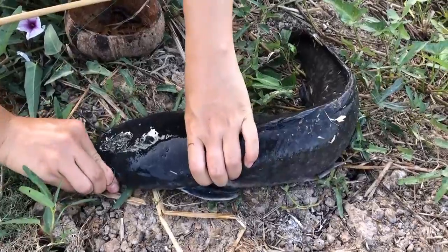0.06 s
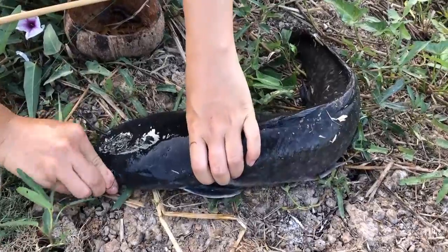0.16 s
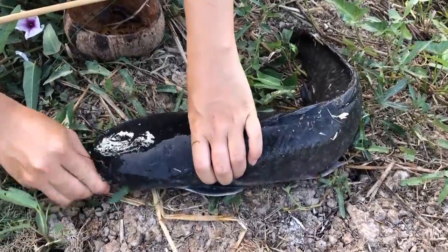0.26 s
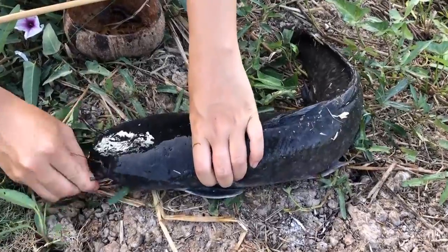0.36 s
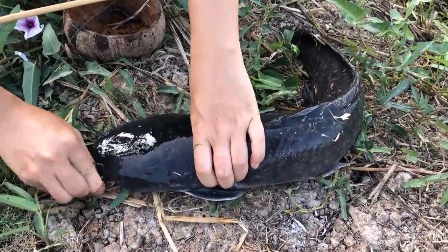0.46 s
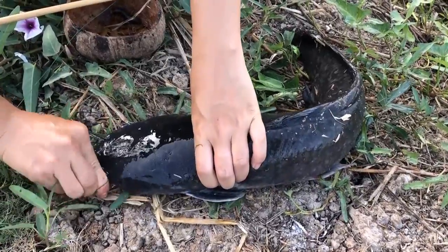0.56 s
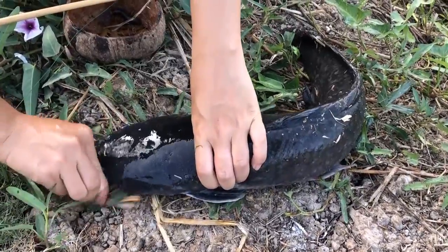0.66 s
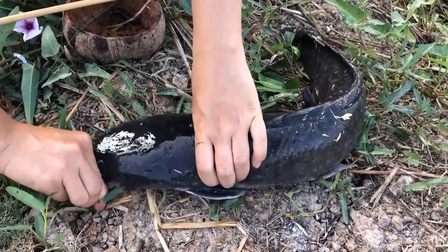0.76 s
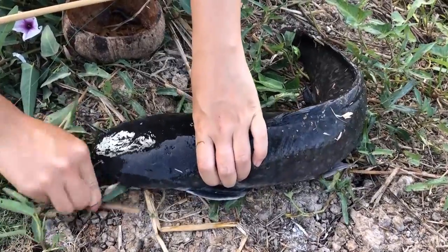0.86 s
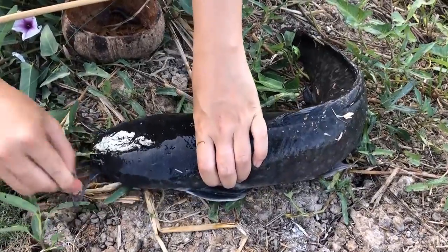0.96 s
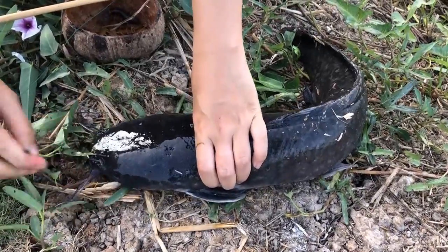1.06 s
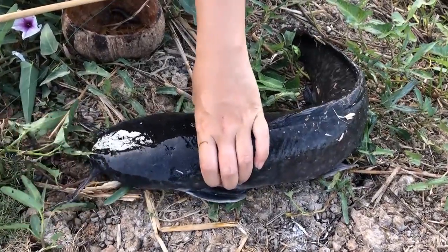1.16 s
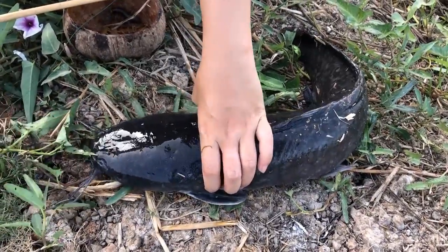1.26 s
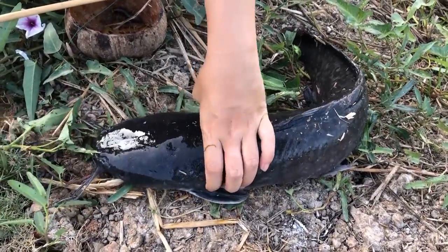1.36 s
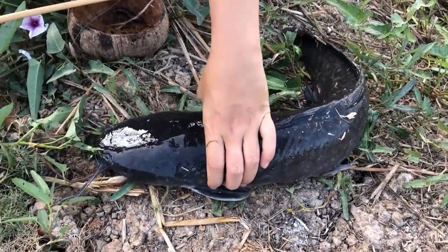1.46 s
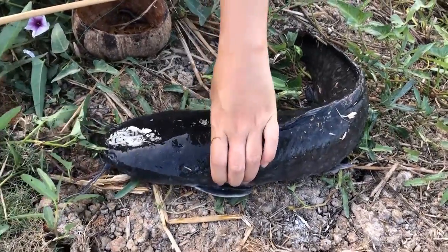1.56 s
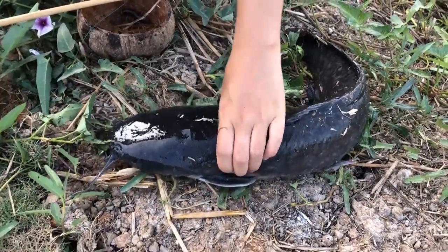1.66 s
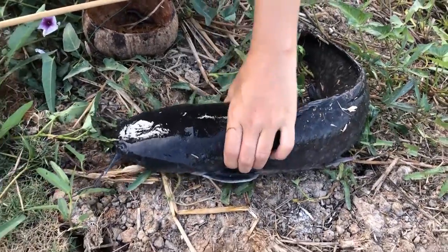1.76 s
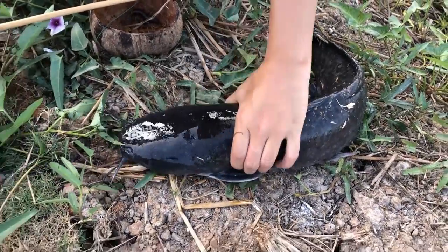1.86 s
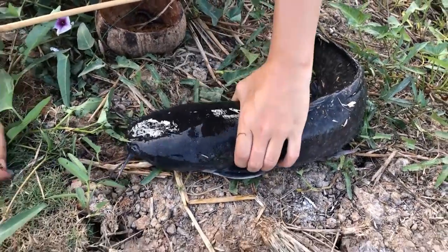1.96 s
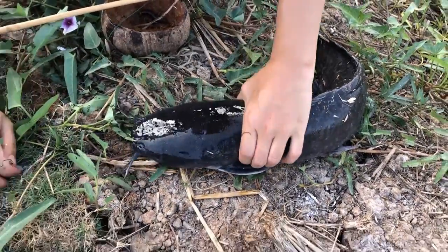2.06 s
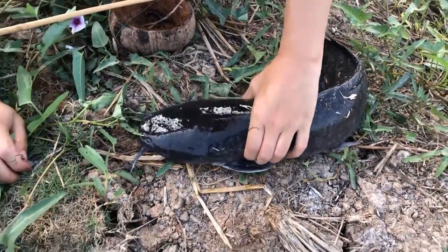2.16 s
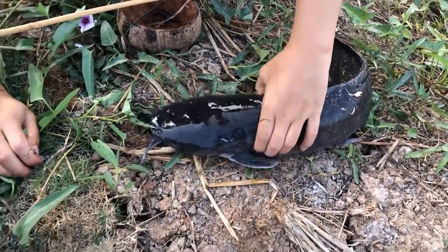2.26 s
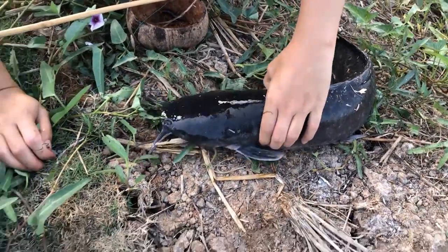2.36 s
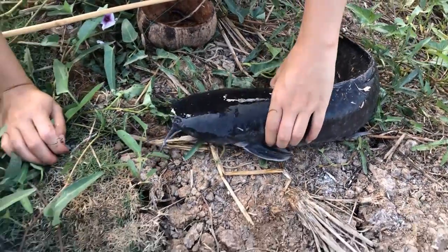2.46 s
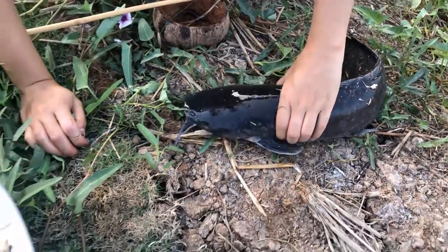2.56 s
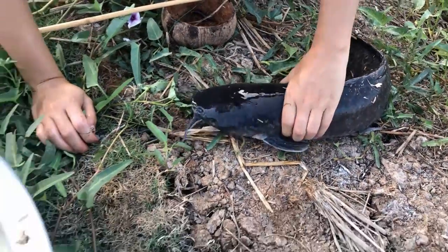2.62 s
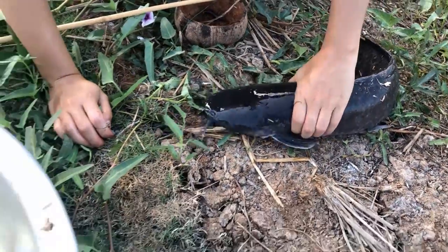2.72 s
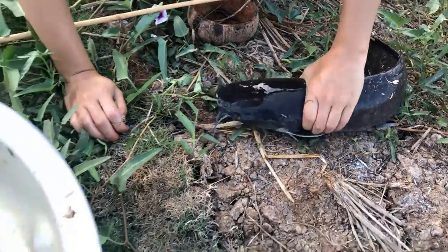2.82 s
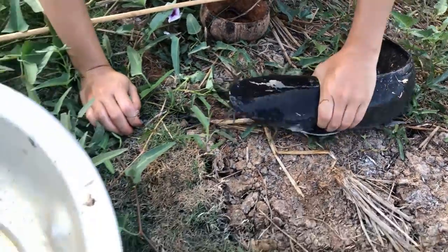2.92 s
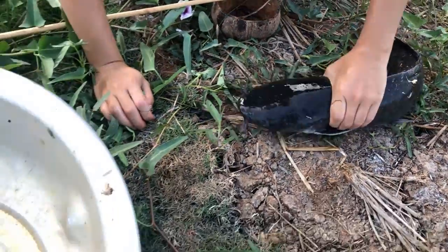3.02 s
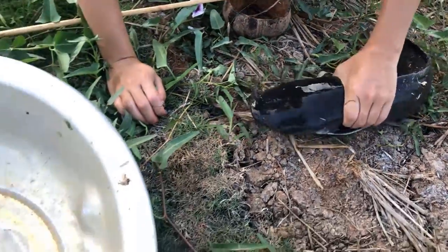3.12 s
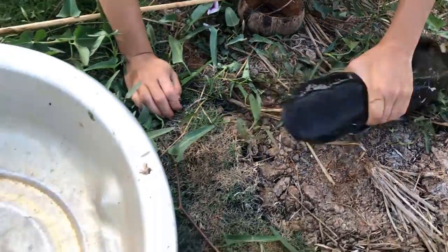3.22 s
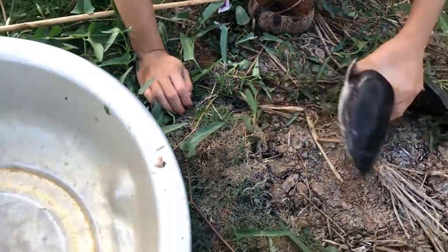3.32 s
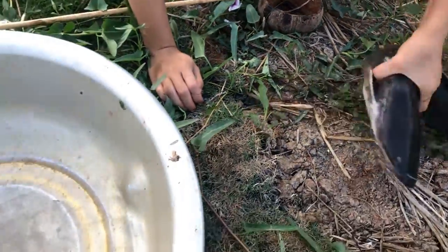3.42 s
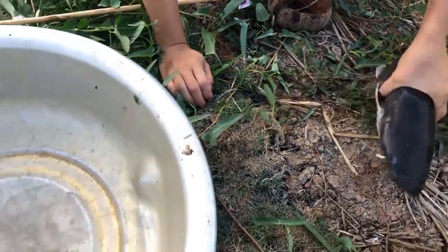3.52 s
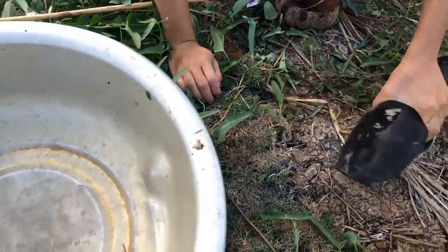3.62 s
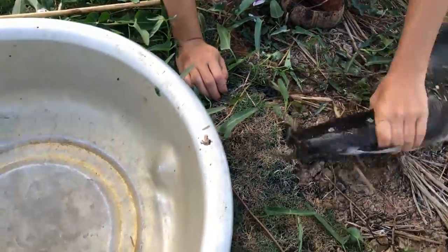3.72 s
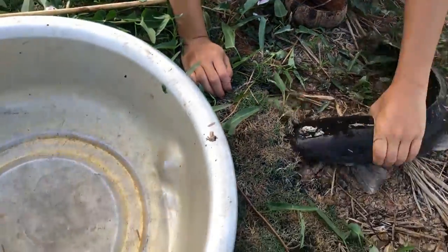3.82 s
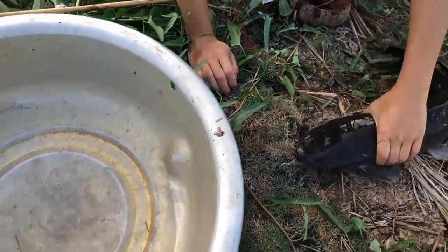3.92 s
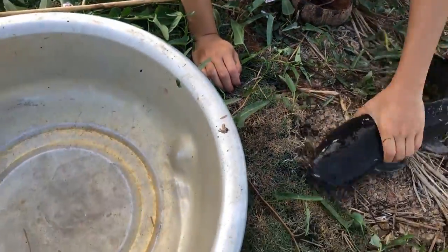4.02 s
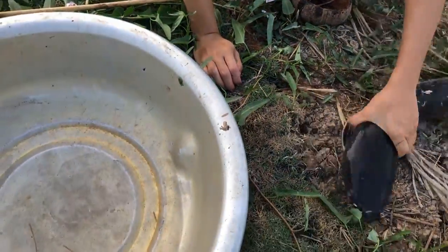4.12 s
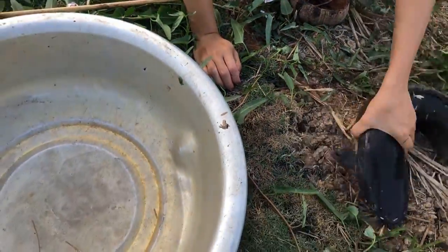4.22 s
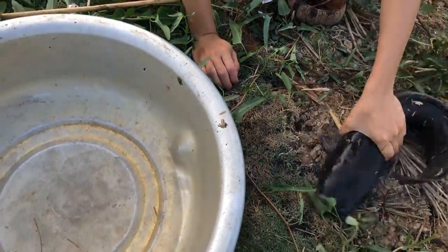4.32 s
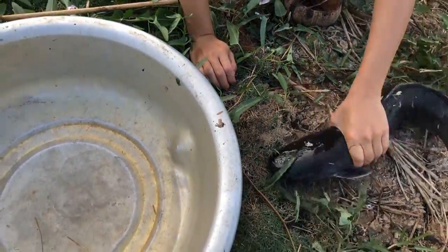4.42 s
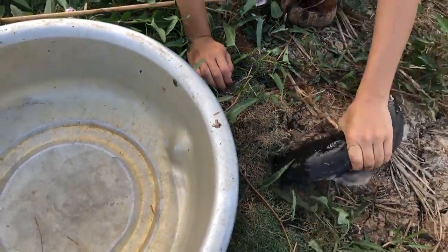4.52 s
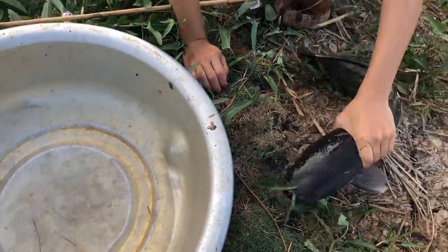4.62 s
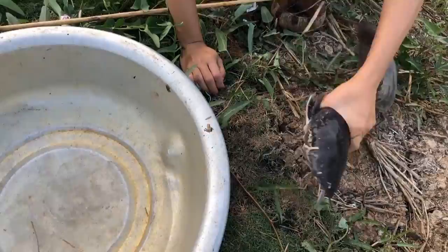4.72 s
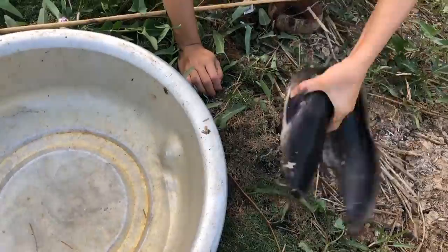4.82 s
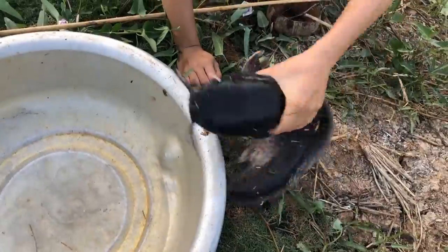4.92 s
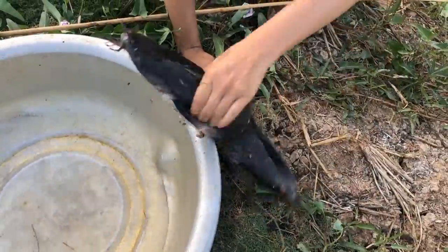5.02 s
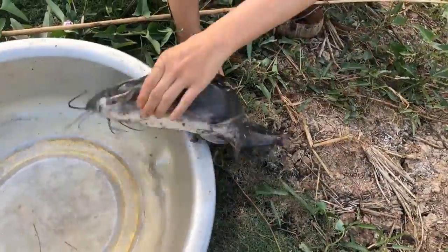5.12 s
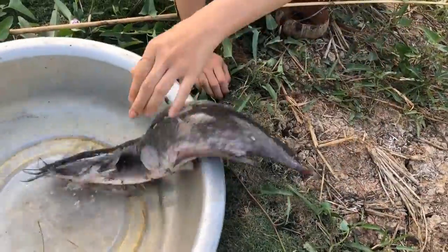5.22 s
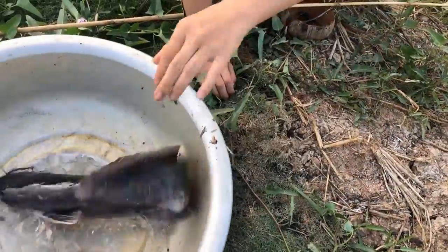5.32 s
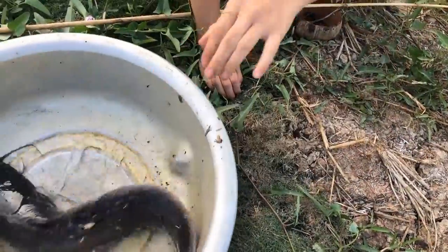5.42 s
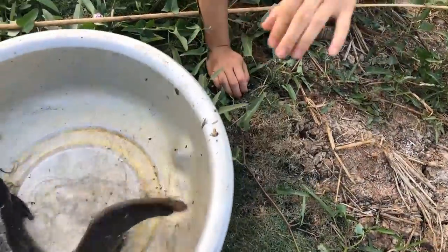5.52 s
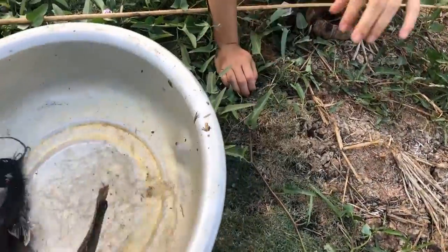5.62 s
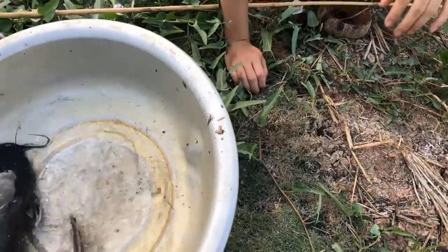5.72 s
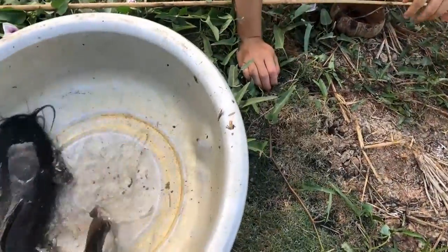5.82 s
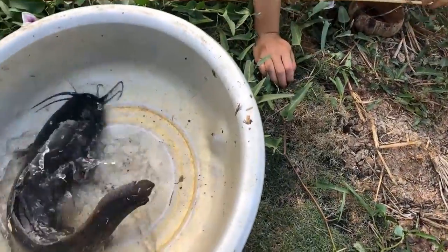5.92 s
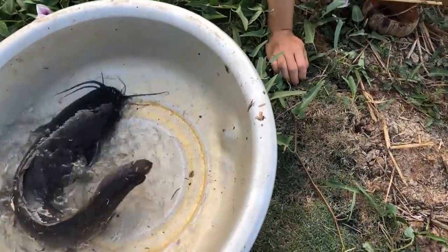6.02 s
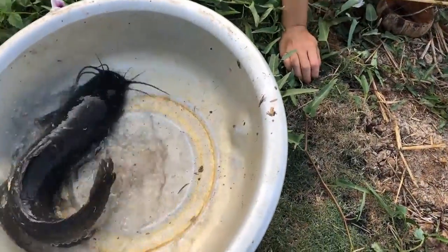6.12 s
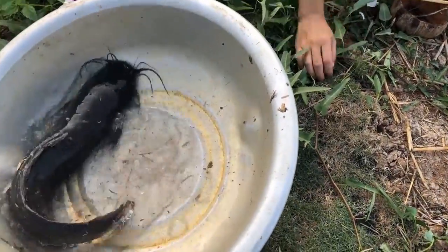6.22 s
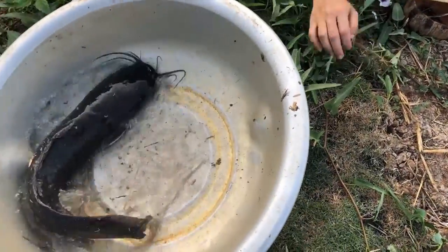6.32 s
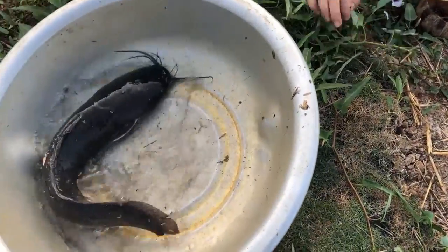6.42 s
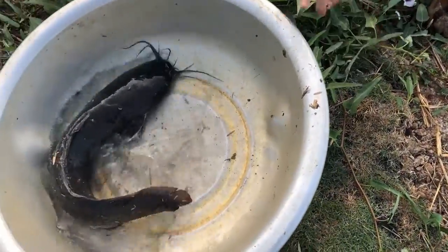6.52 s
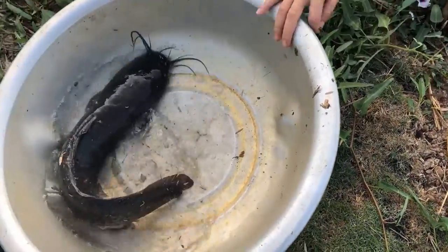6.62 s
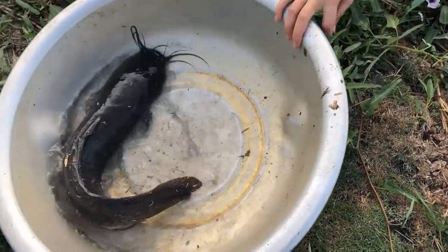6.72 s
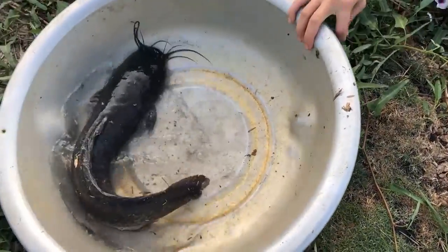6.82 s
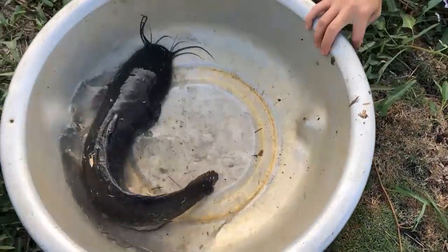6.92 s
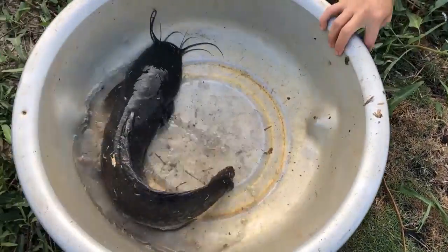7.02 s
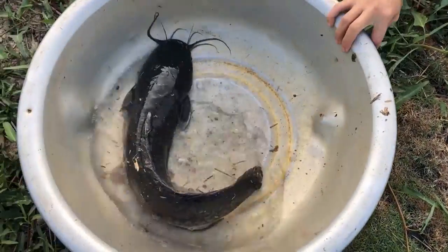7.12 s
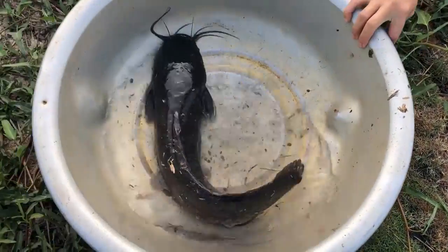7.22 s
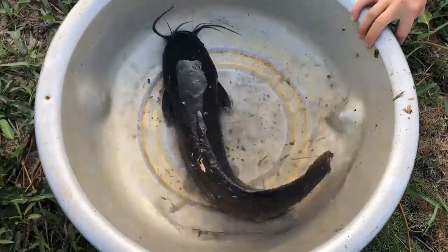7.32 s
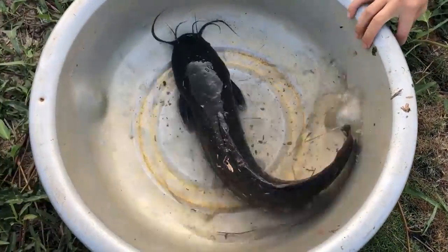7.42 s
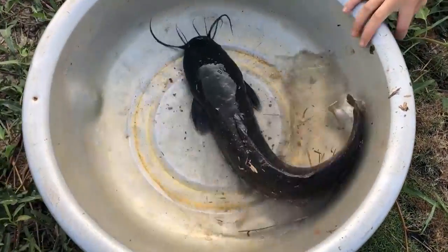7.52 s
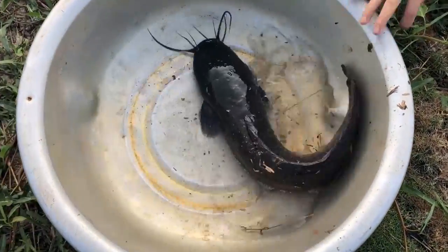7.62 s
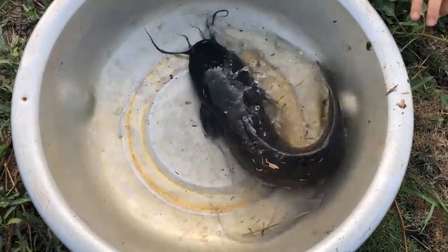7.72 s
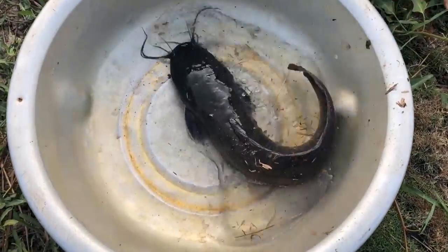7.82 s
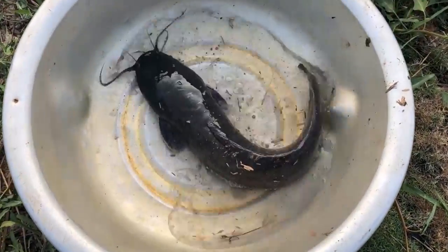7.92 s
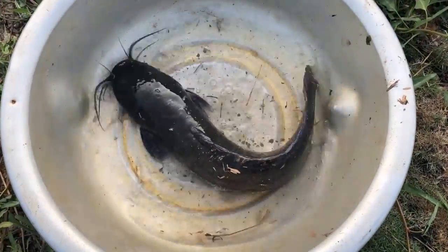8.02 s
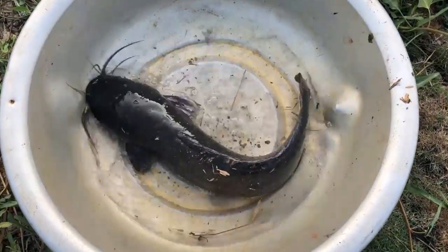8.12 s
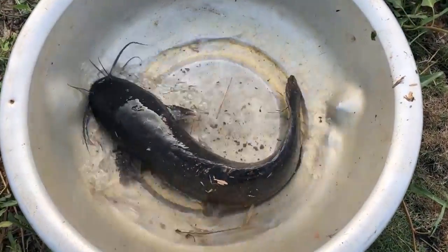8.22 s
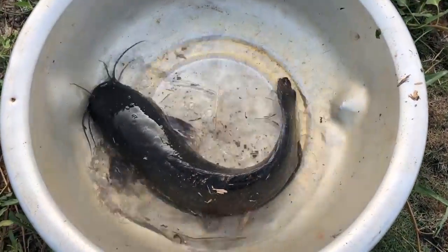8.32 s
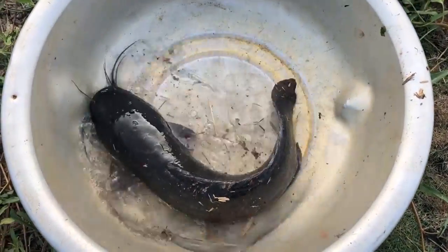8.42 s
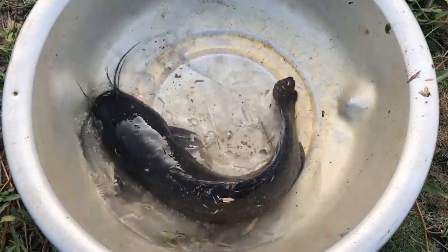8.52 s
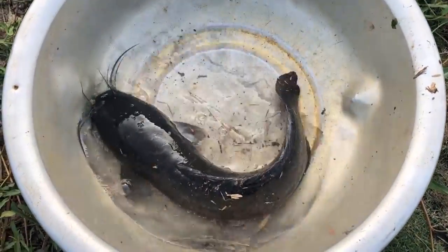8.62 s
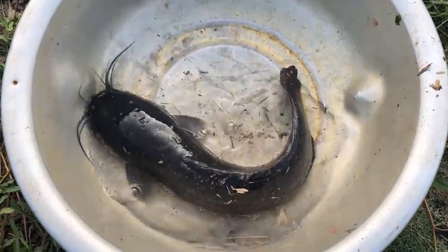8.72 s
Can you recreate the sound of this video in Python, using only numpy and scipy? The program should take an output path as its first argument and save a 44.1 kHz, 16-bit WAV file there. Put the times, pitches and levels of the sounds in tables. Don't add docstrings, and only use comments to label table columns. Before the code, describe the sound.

Quiet grass rustle and birdsong give way to a big fish clanging into a shallow metal basin, with splashes, drips and scrapes.

```python
import sys
import numpy as np
from scipy import signal
from scipy.fft import rfft, irfft, next_fast_len
from scipy.io import wavfile
from scipy.ndimage import uniform_filter1d

SR = 44100
rng = np.random.default_rng(int(sys.argv[2]) if len(sys.argv) > 2 else 0)


def amplitude_ratio(level_db):
    exponent = np.asarray(level_db, float) / 20
    return 10 ** exponent


def int16_out(signal):
    q = np.round(np.clip(np.atleast_2d(signal).T, -1, 1) * 32767)
    wavfile.write(sys.argv[1], SR, q.astype(np.int16))


N = 386757


def rms_one(x):
    return x / np.sqrt(np.mean(x ** 2) + 1e-20)


def in_time(rows, silent=None):
    s, *columns = np.transpose(rows)
    return [np.interp(np.arange(N) / SR, s, c, left=silent, right=silent) for c in columns]


def drift(rate_hz):
    r = np.exp(-2 * np.pi * rate_hz / SR)
    slow = signal.lfilter([1], [1, -2 * r, r * r], rng.standard_normal(N + SR))[SR:]
    return rms_one(slow)


def colour(x, points):
    hz, level_db = np.transpose(points)
    size = next_fast_len(N)
    bins_hz = np.maximum(np.arange(size // 2 + 1) * SR / size, 1)
    gain = amplitude_ratio(np.interp(np.log(bins_hz), np.log(hz), level_db))
    return rms_one(irfft(rfft(x, size) * gain, size)[:N])


def band(x, low_hz, high_hz):
    return signal.sosfilt(signal.butter(2, [low_hz, min(high_hz, .45 * SR)], "band", fs=SR, output="sos"), x)


def ring(clicks, hz, t60):
    r, w = amplitude_ratio(-60 / (t60 * SR)), 2 * np.pi * hz / SR
    return signal.lfilter([0, np.sin(w)], [1, -2 * r * np.cos(w), r * r], clicks + 1e-18)


def grains(per_s, spread_db):
    sizes = amplitude_ratio(spread_db * np.minimum(rng.exponential(1, N), 5)) * rng.choice([-1, 1], N)
    return sizes * (rng.random(N) < per_s / SR)


def add(out, s, sound):
    at = round(s * SR)
    out[at:at + len(sound)] += sound[:N - at]


def struck(blows, modes, contact_s, crack_t60):
    force, out, t = np.zeros(N), np.zeros(N), np.arange(SR // 5) / SR
    for s, level_db, low_hz, high_hz, crack_db in blows:
        contact = band(1.0 * (t == 0), low_hz, high_hz)
        add(force, s, amplitude_ratio(level_db) * contact / np.abs(rfft(contact)).max())
        crack = band(rng.standard_normal(len(t)), low_hz, 2 * high_hz)
        add(out, s, amplitude_ratio(crack_db - 60 * t / crack_t60) * crack)
    busy = slice(round(blows[0][0] * SR), round(blows[-1][0] * SR) + SR)
    for k, (hz, level_db, t60) in enumerate(modes):
        delayed = np.roll(force[busy], int(rng.random() * contact_s * SR))
        out[busy] += amplitude_ratio(level_db - 4.0) * ring(delayed, hz, min(t60, .8)) * (-1) ** k
    return out


# start in seconds, level in dB, contact low and high in Hz, crack in dB.
BANG = (5.5, -13, 260.5, 5001, -14.5)
# pitch in Hz, level in dB, t60 in seconds.
WALL_MODES = [(159, -31, 0.3), (405, -10.5, 0.43), (528.5, -19, 1.4), (807, -11.5, 0.89), (891, -7, 0.3),
              (1022, -14.5, 1.3), (1138, -14.5, 0.8), (1190, -1.5, 0.13), (1244, -16, .8),
              (1460, -17.5, .8), (1327, -12.5, 0.25), (1400, -16.5, 2.1), (1530, -21, 1.0),
              (1570, -17, 0.4), (1770, -5, 0.25), (1855, -0.5, 0.23), (1930, -9, 0.16), (1956, -7.5, 0.37),
              (2170, -11, 0.37), (2350, -12.5, 0.2), (2490, -13.5, 0.18), (2390, -11, 0.12),
              (3309, -12.5, 0.16), (3970, -10.5, 0.12), (4253, -16, 0.16), (5250, -25.5, 0.3)]
# centre in Hz, level in dB, t60 in seconds.
WASH = [(700, -26, 0.18), (1300, -28.5, .45), (1700, -22, 0.28), (2840, -13.5, 0.097), (4000, -23, 0.06),
        (6400, -18, 0.079), (10500, -19.5, 0.041)]


def bang():
    out = struck([BANG], WALL_MODES, 0.006, 0.026) * amplitude_ratio(1.8 * drift(46))
    since = np.arange(SR // 2) / SR
    for hz, level_db, t60 in WASH:
        noise = rms_one(band(rng.standard_normal(len(since)), hz / 1.27, hz * 1.346))
        add(out, BANG[0], amplitude_ratio(level_db - 60 * since / t60) * np.minimum(since / 0.0013, 1) * noise)
    hush_s, hush_t60_s = 5.70, 0.086
    return out * amplitude_ratio(-60 * np.maximum(np.arange(N) / SR - hush_s, 0) / hush_t60_s)


# start in seconds, level in dB, contact low and high in Hz, crack in dB.
KNOCKS = [
    (4.983, -36, 2500, 3187, -31.5),
    (4.9836, -34, 3200, 9240, -40),
    (4.984, -45.5, 900, 2200, -52),
    (5.155, -32, 600, 2000, -36),
    (5.279, -35, 100, 893, -32),
    (5.351, -34, 500, 2001, -30.5),
    (5.41, -37, 400, 910, -51),
    (5.902, -52, 500, 1510, -30.5),
]
# pitch in Hz, level in dB, t60 in seconds.
RIM_MODES = [(161, 0.5, 0.36), (320, -7, 0.26), (654, -2.5, 0.2), (1170, -13, .15), (1245, -13.5, 0.4),
             (1800, -3.5, 0.19), (1895, -13.5, 0.5), (2110, -16.5, 0.4), (530, -14.5, .6), (810, -19, 0.22),
             (1026, -13.5, 0.22), (1340, -9, .12), (1470, -20, .3), (1990, -19.5, .5), (2240, -24, 0.35),
             (2880, -23.5, .2), (3000, -14.5, .1), (2380, -20, .15), (2557, -8, 0.25), (2700, -4, 0.16),
             (3265, -11, .12), (3900, -4, 0.14), (4400, -6.5, 0.089), (4870, -7.5, .1), (5250, -8.5, .1),
             (5500, -14, 0.079), (6023, -16, 0.09), (6950, -8, .11), (7300, -6.5, .1), (7600, -12, 0.07)]
# centre in Hz, level in dB, t60 in seconds.
SHIMMER = [(4600, -48, 0.21), (7340, -37, 0.13), (12000, -38.5, 0.041)]


def knocks():
    out, since = struck(KNOCKS, RIM_MODES, 0.0013, 0.089), np.arange(SR // 2) / SR
    for hz, level_db, t60 in SHIMMER:
        noise = rms_one(band(rng.standard_normal(len(since)), hz / 1.55, hz * 1.13))
        add(out, KNOCKS[0][0], amplitude_ratio(level_db - 60 * since / t60) * noise)
    return out


# time in seconds, slosh level in dB.
THRASH = [
    (5.1, -59),
    (5.152, -57),
    (5.5, -44),
    (5.55, -28.5),
    (5.652, -46),
    (5.686, -34.5),
    (5.762, -47.5),
    (5.928, -49.5),
    (6.2, -57),
]
# peak time in seconds, rise in seconds, level in dB, t60 in seconds.
FLOPS = [
    (6.2, 0.0078, -63.5, 0.84),
    (6.43, 0.011, -52.5, 0.1),
    (6.486, 0.029, -60, 1.4),
    (7.715, 0.13, -61, 0.8),
    (8.348, 0.11, -54, 0.28),
]


def slosh_level():
    t, level = np.arange(N) / SR, amplitude_ratio(in_time(THRASH, silent=-150)[0])
    for s, rise_s, level_db, t60 in FLOPS:
        rise_db = 40 * (s - t) / rise_s
        fall_db = 60 * (t - s) / t60
        level = level + amplitude_ratio(level_db - np.maximum(rise_db, fall_db))
    return level


# pitch in Hz, level in dB, t60 in seconds.
WET_WALL = [(164, -9.5, 0.19), (397, -7, 0.4), (530.5, 1.5, 0.4), (665, -3, 0.33), (1200, -9.5, .2),
            (1610, -9, 0.12), (1800, -14, 0.1)]


def slosh():
    t = np.arange(N) / SR
    pushes = grains(1500 * amplitude_ratio(4.0 * drift(18)), spread_db=2.5)
    dealt = rng.integers(0, 20, N)
    sizes_hz = np.geomspace(600, 3800, 20)
    bubbles = sum(ring(pushes * (dealt == k), hz, 51.0 / hz) for k, hz in enumerate(sizes_hz))
    wall = sum(amplitude_ratio(level_db) * ring(pushes, hz, t60) for hz, level_db, t60 in WET_WALL)

    def even(x):
        return x / np.sqrt(uniform_filter1d(x ** 2, size=3000) + 1e-9)

    humming = (t > 5.5) & (t < 6.3)
    return slosh_level() * (amplitude_ratio(-5) * even(band(bubbles, 960, 6600)) + amplitude_ratio(-7.0) * even(wall) * humming)


# start in seconds, level in dB,
# pitch in Hz, t60 in seconds.
THUDS = [(0.163, -53, 191, 0.11), (2.894, -50, 400, 0.01), (3.816, -39.5, 224, 0.015),
         (4.363, -27.5, 322, 0.0045), (4.882, -42, 195, 0.026), (4.904, -42, 300, 0.013),
         (5.107, -46.5, 82.5, 0.051), (5.28, -13.5, 198, 0.018), (5.301, -30, 160, 0.059),
         (5.503, -23, 244, 0.041), (3.822, -43, 159, .05), (5.33, -43, 161, 0.67), (5.412, -43, 436, 0.061),
         (5.44, -42, 320, 0.067), (5.508, -33.5, 161, 0.66)]


def thuds():
    out, since = np.zeros(N), np.arange(SR // 2) / SR
    for s, level_db, hz, t60 in THUDS:
        onset = np.minimum(since / 0.002, 1)
        add(out, s - .002, amplitude_ratio(level_db - 60 * since / t60) * np.sin(2 * np.pi * hz * since) * onset)
    return out


# start in seconds, length in seconds, level in dB, ring in Hz.
CREAKS = [
    (1.066, .034, -52, 804),
    (1.298, .095, -54.5, 794),
    (2.586, .024, -56.5, 1120),
    (3.121, .003, -43.5, 320),
    (3.141, .013, -49.5, 301),
    (3.23, .003, -48.5, 301),
    (3.304, .003, -53, 382),
    (3.337, .003, -43.5, 290),
    (3.643, .003, -49, 332),
    (3.666, .003, -54.5, 468),
]


def creaks():
    out, t = np.zeros(N), np.arange(SR // 10) / SR
    first_gap_s, slowing, loss_db = .0072, 1.25, 1.5
    slips_s = first_gap_s * (np.cumsum(slowing ** np.arange(8)) - 1)
    for s, length, peak_db, hz in CREAKS:
        for k, late in enumerate(slips_s[slips_s < length]):
            add(out, s + late, amplitude_ratio(peak_db - loss_db * k - 60 * t / 0.0081) * np.sin(2 * np.pi * hz * t))
    return out


# start in seconds, start pitch in Hz, rise per second, level in dB, cycles.
PLOPS = [
    (3.842, 930, 2.0, -42, 26),
    (5.902, 932, 0.17, -31, 79),
    (6.424, 700, 2.5, -51, 60),
    (6.556, 672, 1.7, -64, 60),
    (6.733, 671, 1.3, -63, 57),
    (7.72, 690, 0.38, -52, 47),
    (7.745, 1400, 1.1, -53, 60),
    (8.375, 1480, 0.24, -58, 155),
    (8.412, 1700, 0.29, -57, 54),
]


def plops():
    out, t = np.zeros(N), np.arange(SR // 10) / SR
    for s, hz, rise, level_db, cycles in PLOPS:
        tone = np.sin(2 * np.pi * hz * t * (1 + rise * t))
        add(out, s, amplitude_ratio(level_db - 60 * t * hz / cycles) * np.minimum(t / 0.0033, 1) * tone)
    return out


# start in seconds, length in seconds, start and end pitch in Hz, level in dB.
POCKETS = [(2.775, 0.052, 655, 856, -72), (5.558, 0.025, 876, 1030, -37), (5.568, 0.024, 1910, 1750, -30),
           (5.6, 0.018, 1514, 1740, -29), (5.601, 0.052, 405, 421, -36), (5.67, 0.035, 812, 875, -27),
           (5.72, 0.02, 510, 573, -39.5), (5.636, 0.043, 529, 590, -33.5), (5.672, 0.032, 986, 1064, -29),
           (5.905, 0.019, 336, 520, -54), (6.057, 0.021, 1458, 1610, -52), (6.08, 0.053, 347, 907, -54),
           (6.146, 0.023, 903, 960, -56.5), (6.164, 0.023, 1300, 1460, -55.5),
           (5.999, .02, 1890, 2110, -53), (6.039, .018, 1990, 2260, -53), (6.087, 0.016, 1200, 1400, -49.5),
           (6.155, .012, 1540, 1850, -54), (6.175, 0.0087, 1800, 2260, -48), (8.33, 0.015, 1470, 1000, -46),
           (8.349, 0.027, 850, 1300, -49.5), (3.859, 0.023, 930, 1100, -58),
           (8.349, .035, 2740, 2700, -65.5)]


def pockets():
    out = np.zeros(N)
    for s, length, start_hz, end_hz, level_db in POCKETS:
        u = np.arange(0, 1, 1 / (length * SR))
        glide_hz = start_hz + (end_hz - start_hz) * u ** 1.4
        swell = np.minimum(u / 0.37, 1) * np.minimum((1 - u) / 0.2, 1)
        add(out, s, amplitude_ratio(level_db) * swell * np.sin(2 * np.pi * np.cumsum(glide_hz) / SR))
    return out * (1 + .15 * drift(90))


# start in seconds, peak in dB, ring in Hz.
SNAPS = [(0.62, -51.5, 6400), (0.843, -50, 6040), (2.894, -48.5, 1800), (3.447, -42, 3700),
         (3.867, -44, 900), (4.36, -42.5, 7700), (4.391, -44, 9300), (4.491, -49, 1370), (4.655, -44, 3620),
         (4.883, -35.5, 500), (4.902, -33, 8300), (5.472, -30.5, 2980), (5.709, -30, 1900),
         (5.815, -36, 875), (5.839, -38, 1120), (5.947, -35, 3540), (5.983, -34, 3100), (6.08, -35.5, 1340),
         (6.422, -44.5, 738), (6.504, -53, 2990), (6.568, -50.5, 1700), (6.665, -42.5, 3280),
         (7.771, -45, 1400), (8.284, -45.5, 2170), (8.334, -38, 930)]
# start in seconds, peak in dB, ring in Hz.
DRIPS = [(0.773, -32.5, 8500), (3.815, -35, 815), (4.27, -36.5, 8460), (4.842, -32, 2270),
         (5.727, -28.5, 1690), (5.872, -36.5, 3380), (6.1405, -33, 4400), (6.175, -34.5, 2500),
         (6.228, -43, 4900), (6.269, -40, 6240), (6.46, -45, 3580), (7.679, -48.5, 4463),
         (7.715, -36.5, 4130), (7.719, -29, 7300), (7.74, -38.5, 3330), (7.825, -54, 3000),
         (7.858, -49, 4630), (8.232, -44.5, 9680), (8.241, -43, 2070), (8.253, -42, 5520),
         (8.504, -49, 3095)]


def snaps_and_drips():
    out, t = np.zeros(N), np.arange(SR // 10) / SR
    for table, crack_db in ((SNAPS, 3.5), (DRIPS, -7.5)):
        for s, peak_db, hz in table:
            tone = amplitude_ratio(-60 * t / (0.0093 + 5.1 / hz)) * np.sin(2 * np.pi * hz * t * (1 + 2.0 * t))
            crack = amplitude_ratio(crack_db - 60 * t / 0.017) * band(rng.standard_normal(len(t)), 930, 6500 + hz)
            add(out, s, amplitude_ratio(peak_db - 5.0) * (tone + crack))
    return out


# start in seconds, peak in dB, ring in Hz.
TICKS = [(.09, -63, 11000), (.165, -62, 8950), (.198, -53, 11500), (0.471, -56, 7200), (0.546, -55, 12000),
         (.574, -62, 10000), (2.76, -56, 7500), (2.898, -54, 1720), (2.935, -63, 2570), (4.797, -53, 8900),
         (4.895, -46, 12000), (4.928, -52, 11000), (5.026, -55, 13000), (5.178, -46, 8000),
         (5.284, -38, 7000), (5.3, -42, 9000), (5.337, -50, 8000), (5.353, -34, 8250), (5.355, -35, 9200),
         (5.375, -47, 9100), (5.389, -58, 10500), (5.402, -43, 4140), (5.414, -53, 5500),
         (5.457, -46, 9000), (5.475, -32, 8900), (5.483, -45, 12000), (5.676, -37, 3700),
         (5.709, -31.5, 8040), (5.785, -57, 3660), (5.793, -45, 9800), (5.818, -45, 7000),
         (5.903, -33.5, 8430), (5.919, -36, 3900), (5.946, -35.5, 6150), (5.981, -37, 5500),
         (5.992, -39, 3340), (6.023, -41, 7800), (6.036, -45, 8000), (6.088, -45, 6540), (6.132, -46, 3360),
         (6.151, -48, 3430), (6.164, -49, 8100), (6.175, -49, 7460), (6.264, -53, 2740), (6.286, -54, 6240),
         (6.297, -54, 7800), (6.487, -53, 4600), (6.529, -59, 6560), (6.584, -55.5, 6050),
         (6.667, -54.5, 4777), (8.224, -52, 6495), (8.232, -51, 6800), (8.333, -39, 7900),
         (7.793, -58, 4800), (7.827, -59, 8400), (7.773, -53, 9400), (8.417, -53, 6820), (8.764, -63, 5980)]


def ticks():
    out, t = np.zeros(N), np.arange(SR // 40) / SR
    for s, peak_db, hz in TICKS:
        turns = hz * t
        part = turns / 66
        add(out, s, amplitude_ratio(peak_db - 60 * part) * np.sin(2 * np.pi * turns * (1 + 0.11 * part)))
    return out


# start in seconds, peak in dB.
STRAW_TICKS = [(4.0886, -66), (4.2814, -42), (4.2974, -47), (4.3094, -58), (4.3244, -51), (4.3724, -46),
               (4.384, -48), (4.4234, -50), (4.6774, -50), (5.2789, -34), (5.3512, -30)]


def stalks():
    out, t = np.zeros(N), np.arange(SR // 50) / SR
    for s, peak_db in STRAW_TICKS:
        hiss = band(rng.standard_normal(len(t)), 5200, 16000)
        add(out, s, amplitude_ratio(peak_db - 6.0 - 60 * t / 0.014) * hiss)
    return out


# frequency in Hz, level in dB per Hz.
STRAW = [(180, -33.5), (300, -6.5), (1320, -5), (1480, -3), (2210, -5.5), (3240, -2), (11300, -7.5),
         (14700, -11.5), (15800, -16.5), (16150, -50.5)]
# start in seconds, length in seconds, level in dB.
CRACKLES = [(0.0, 0.42, -83), (0.415, 0.82, -83), (1.41, 0.32, -80), (2.74, 1.1, -84), (3.287, 2.2, -77),
            (5.231, 0.33, -60), (5.567, 0.089, -51.5), (5.648, 0.1, -56), (5.728, 0.22, -66.5),
            (5.884, 0.17, -64.5), (6.003, 0.21, -63), (6.095, 1.06, -76.5), (7.555, 0.46, -74),
            (8.149, 0.3, -79.5)]


def crackles():
    droplets = grains(700 * amplitude_ratio(5.0 * drift(20)), spread_db=5.5)
    dealt = rng.integers(0, 8, N)
    pitches_hz = np.geomspace(2200, 11000, 8)
    pings = sum(ring(droplets * (dealt == k), hz, 15.0 / hz) for k, hz in enumerate(pitches_hz))
    crackle = rms_one(grains(2500 * amplitude_ratio(8.1 * drift(30)), spread_db=3.5)) + 0.32 * rng.standard_normal(N)
    level = np.zeros(N)
    for s, length, level_db in CRACKLES:
        add(level, s, amplitude_ratio(level_db) * signal.windows.tukey(round(length * SR), .4))
    return level * (amplitude_ratio(2.0 + 1.3 * drift(30)) * colour(crackle, STRAW) + amplitude_ratio(-5.0) * rms_one(pings))


# start in seconds, length in seconds, level in dB, half the drop in
# dB of everything above about 4 kHz (negative brightens).
SWISHES = [(0.758, 0.057, -66, -2), (0.923, 0.073, -80, -5), (3.2, 2.5, -87, 1), (3.374, 0.18, -66, -0.5),
           (3.766, 0.17, -64.5, 1), (4.115, 0.23, -67, -2.5), (4.323, 0.14, -70.5, -1.5),
           (4.866, 0.057, -49, 1.5), (4.901, 0.05, -69, -2), (5.081, 0.18, -51, 0.5), (5.14, 0.11, -50, 5),
           (5.26, .1, -49.5, 3), (5.346, 0.43, -50, 1), (5.666, 0.063, -51, -2.5), (5.86, 0.19, -53, -1),
           (6.964, 0.29, -57.5, 1.5), (7.203, 0.24, -53.5, 1.5), (7.701, 0.066, -49.5, 5),
           (8.219, 0.063, -57, 4.5), (8.318, 0.05, -52, 5.5)]
# pitch in Hz, level in dB, t60 in seconds.
DRAG_TONES = [(693, -74.5, 0.067), (1610, -68.5, 0.019), (3100, -67, 0.0054)]


def swishes():
    rubbing = rng.standard_normal(N) + 0.28 * rms_one(grains(2700, spread_db=2.5))
    sweep = amplitude_ratio(1.82 * drift(29)) * colour(rubbing, STRAW)
    dull, airy = band(sweep, 200, 4200), band(sweep, 12000, 19000)
    out, dragging = np.zeros(N), np.zeros(N)
    for s, length, level_db, fall_db in SWISHES:
        at = slice(round(s * SR), round((s + length) * SR))
        top = sweep - dull + amplitude_ratio(-17.5 - 2 * fall_db) * airy
        mix = dull[at] + amplitude_ratio(-2 * fall_db) * top[at]
        swell = signal.windows.tukey(len(mix), .8)
        add(out, s, amplitude_ratio(level_db) * swell * mix)
        if 6.95 < s < 7.42:
            add(dragging, s, swell)
    grit = grains(1500, spread_db=2.5)
    scrape = sum(amplitude_ratio(level_db) * rms_one(ring(grit, hz, t60)) for hz, level_db, t60 in DRAG_TONES)
    return out + dragging * scrape


# start in seconds, peak in dB, low note in Hz.
CHIRPS = [(0.9167, -61.5, 3500), (1.0534, -62, 3440), (1.197, -61, 3420), (1.3513, -55, 3390),
          (1.4874, -57, 3597), (1.6306, -57.5, 3440), (1.7588, -62, 3510), (1.9084, -54.5, 3390),
          (2.0935, -53.5, 3460), (2.2342, -57.5, 3360), (2.3993, -69, 3320), (2.527, -55, 3720),
          (2.6704, -60.5, 3700), (2.8158, -59.5, 3490), (2.9745, -58, 3750), (3.1222, -60, 3780),
          (3.2757, -56.5, 3740), (3.428, -64, 3630), (3.5911, -62, 3570), (3.77, -63, 3420)]


def chirps():
    out, t = np.zeros(N), np.arange(round(.055 * SR)) / SR
    low_husk, high_husk = drift(160), drift(200)
    swell = np.sin(np.pi * t / t[-1])
    for s, peak_db, low_hz in CHIRPS:
        low = (-.013, low_hz, peak_db, low_husk)
        high = (.011, .35 * low_hz + 2550, min(-60.5, peak_db + 1), high_husk)
        for late, hz, level_db, husk in (low, high):
            rough = .7 + .6 * husk[round(s * SR):][:len(t)]
            phase = 2 * np.pi * hz * t * (1 + 0.13 * t)
            partials = np.sin(phase / 2) + np.sin(3 * phase / 2)
            add(out, s + late, amplitude_ratio(level_db - 5.0) * swell * rough * (np.sin(phase) + amplitude_ratio(-19.5) * partials))
    out[4000:] += amplitude_ratio(-18.5) * out[:-4000]
    return out


# start in seconds, length in seconds, start and end pitch in Hz, level in dB.
TWEETS = [(6.268, 0.048, 3600, 3900, -68), (6.35, 0.055, 3810, 3900, -75), (6.453, .03, 3400, 3580, -60),
          (6.695, 0.035, 3700, 4000, -71), (6.736, 0.033, 3600, 3900, -71.5),
          (6.802, 0.065, 3360, 3520, -74.5), (6.84, 0.09, 3720, 3800, -72), (6.953, 0.053, 3710, 3970, -69),
          (8.01, .05, 3700, 3500, -73), (8.076, 0.031, 3820, 4000, -74), (8.145, .048, 3830, 3900, -68),
          (8.434, 0.075, 3790, 3955, -68), (8.455, 0.049, 3150, 2930, -73.5),
          (8.528, 0.027, 3880, 3900, -71), (8.575, 0.046, 3590, 3450, -70.5),
          (8.604, .045, 3550, 4000, -70.5), (8.665, 0.053, 3440, 4090, -71.5),
          (8.748, .025, 3500, 3500, -70)]


def tweets():
    out, husk = np.zeros(N), .7 + .5 * drift(120)
    for s, length, start_hz, end_hz, level_db in TWEETS:
        u = np.arange(0, 1, 1 / (length * SR))
        glide_hz = start_hz + (end_hz - start_hz) * u
        swell = np.sqrt(np.sin(np.pi * u))
        add(out, s, amplitude_ratio(level_db) * swell * np.sin(2 * np.pi * np.cumsum(glide_hz) / SR))
    return out * husk


# time in seconds, pitch in Hz, level in dB.
WHISTLE = [
    (0.95, 1440, -85.5),
    (1.4, 1510, -90.5),
    (2.67, 1537, -84.5),
    (3.2, 1455, -81.5),
    (3.321, 1420, -83),
]


def whistle():
    hz = in_time(WHISTLE)[0]
    level_db = in_time([(s, row_db) for s, _, row_db in WHISTLE], silent=-150)[0]
    return amplitude_ratio(level_db + 3 + 3.5 * drift(7)) * np.sin(2 * np.pi * np.cumsum(hz) / SR)


# start in seconds, length in seconds,
# pitch in Hz, level in dB.
FAR_CALLS = [(.12, 0.15, 5200, -82.5), (0.378, 0.19, 4120, -78), (0.909, 2.9, 1870, -89),
             (0.992, 0.21, 5800, -78.5), (3.853, 1.1, 2660, -88), (6.87, 0.22, 5500, -84),
             (8.4, .37, 1206, -84.5), (8.421, 0.23, 8070, -90), (6.002, 0.24, 3700, -69),
             (7.399, .3, 3590, -86.5), (8.35, .4, 2900, -93), (8.447, 0.1, 1900, -83),
             (0.995, 1.6, 2620, -101), (1.994, 0.97, 4840, -91.5)]


def far_calls():
    out, flutter, half_width = np.zeros(N), amplitude_ratio(5.7 * drift(33)), 0.041
    for s, length, hz, level_db in FAR_CALLS:
        noise = band(rng.standard_normal(SR), hz * (1 - half_width), hz * (1 + half_width))
        husk = rms_one(noise)[:round(length * SR)]
        fade = signal.windows.tukey(len(husk), .3)
        add(out, s, amplitude_ratio(level_db) * husk * fade * flutter[round(s * SR):][:len(husk)])
    return out


# centre in Hz, half width in Hz, level in dB, pulses per second.
INSECTS = [(8900, 220, -94, 9.3), (9680, 210, -98, 15), (3700, 370, -93, 100)]


def insects():
    out = np.zeros(N)
    for hz, width_hz, level_db, rate in INSECTS:
        turns = np.cumsum(rate * (1 + .05 * drift(3))) / SR
        throb = np.clip(3 + 5 * np.sin(2 * np.pi * turns), .6, 3)
        buzz = rms_one(band(rng.standard_normal(N), hz - width_hz, hz + width_hz))
        out += amplitude_ratio(level_db + 1.3 * drift(0.51)) * throb * buzz
    return out


# frequency in Hz, level in dB per Hz.
AIR = [(12, -29.5), (25, -5), (55, 4.5), (79, 2.5), (527, -29.5), (1660, -32), (1910, -31), (2140, -30),
       (3070, -30), (3840, -32.5), (4300, -34.5), (6180, -39.5), (7800, -37.5), (9400, -39), (10800, -43.5),
       (11900, -45.5), (12600, -50), (15500, -54), (16300, -70.5)]


def air():
    return amplitude_ratio(-60.5 + 0.77 * drift(2.5)) * colour(rng.standard_normal(N), AIR)


def scene():
    fish_and_basin = bang() + knocks() + slosh() + thuds() + creaks()
    water = plops() + pockets() + snaps_and_drips() + ticks()
    straw = stalks() + crackles() + swishes()
    background = chirps() + tweets() + whistle() + far_calls() + insects() + air()
    return (fish_and_basin + water + straw + background)[None]


def roll_off(x):
    return signal.sosfilt(signal.butter(12, 16820, fs=SR, output="sos"), x)


def record(dry):
    cut = signal.cheby2(14, 50, 16700, fs=SR, output="sos")
    return roll_off(signal.sosfilt(cut, dry))


dry = scene()
out = record(dry)
int16_out(out)
```